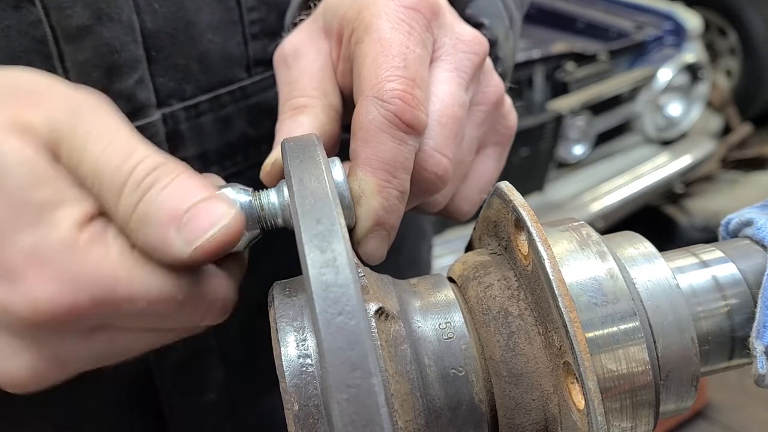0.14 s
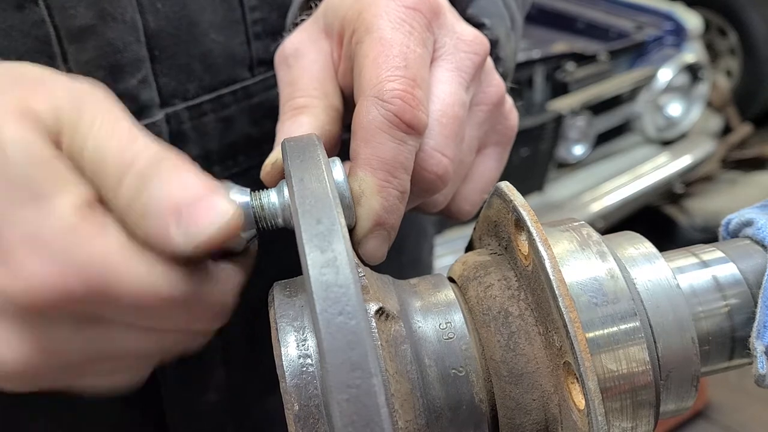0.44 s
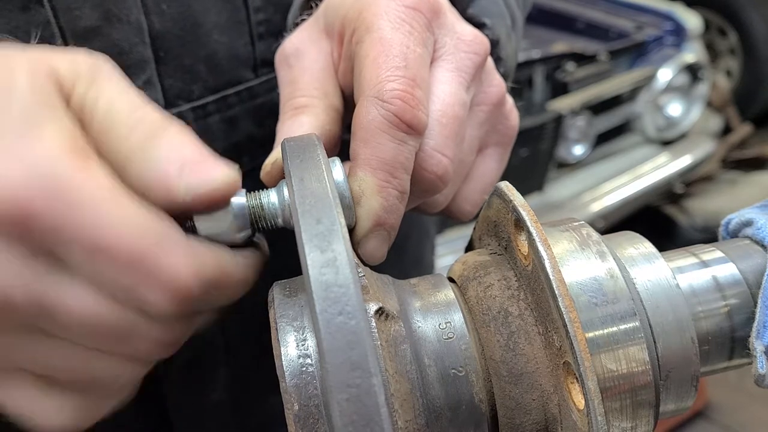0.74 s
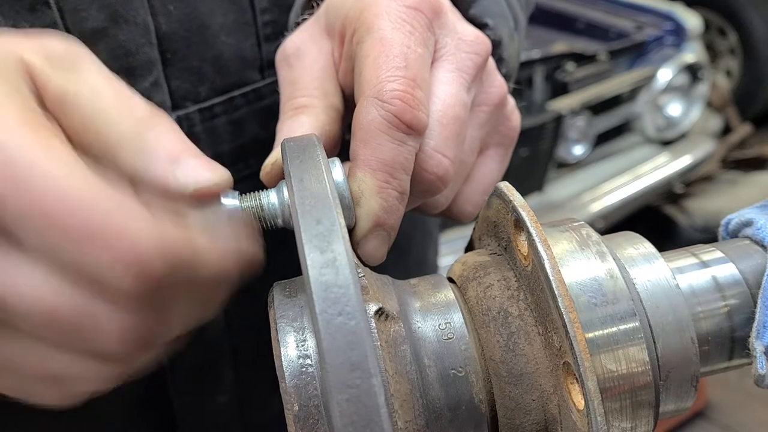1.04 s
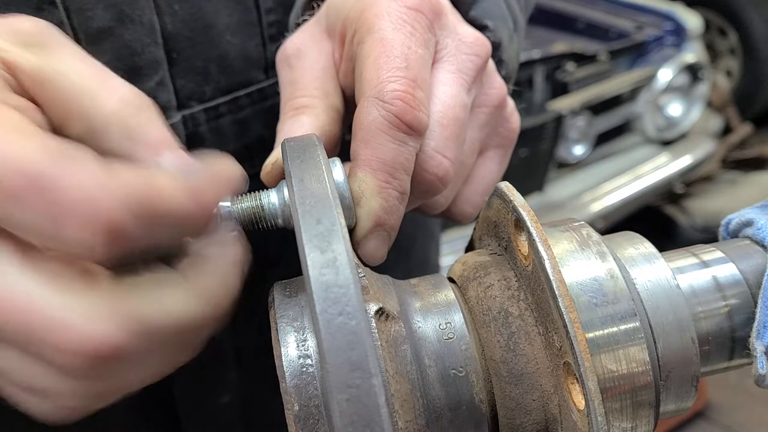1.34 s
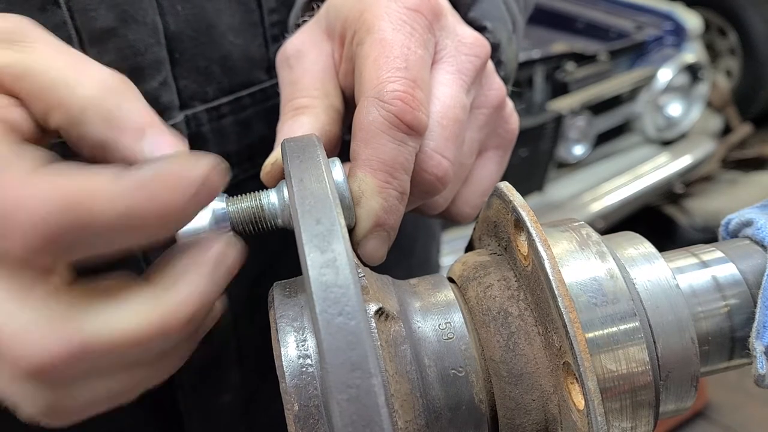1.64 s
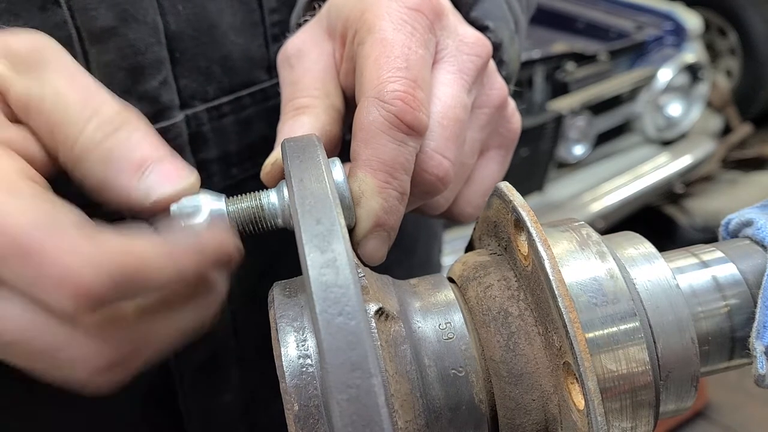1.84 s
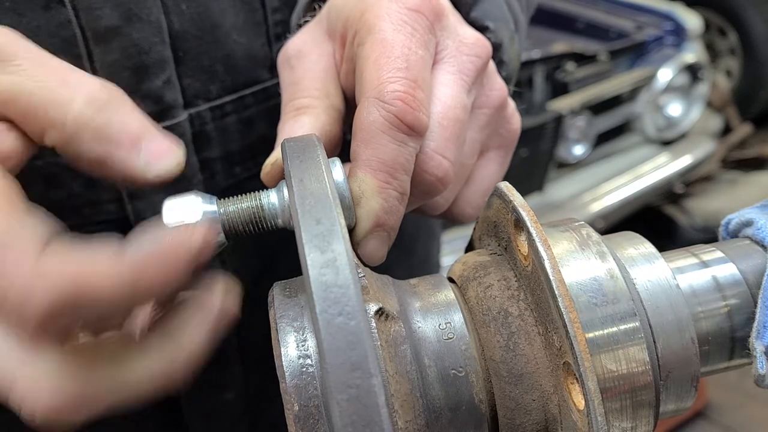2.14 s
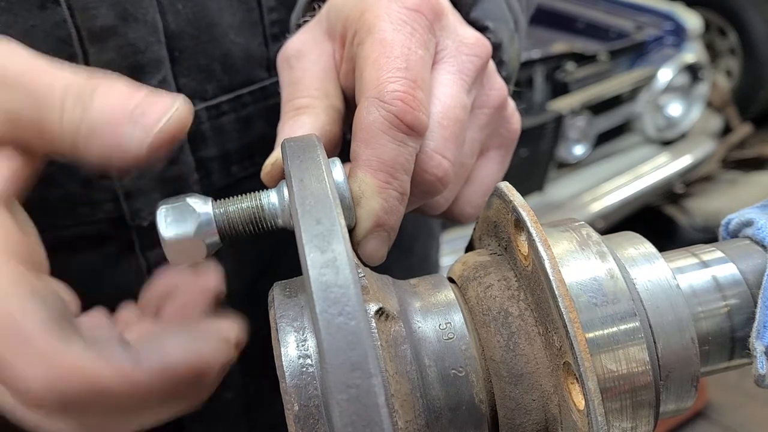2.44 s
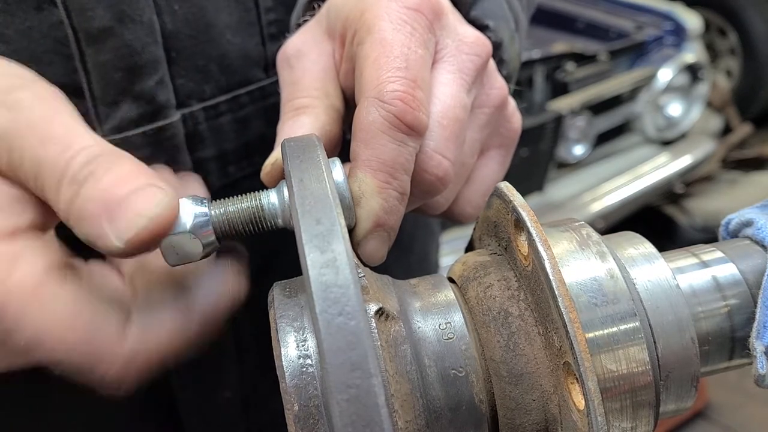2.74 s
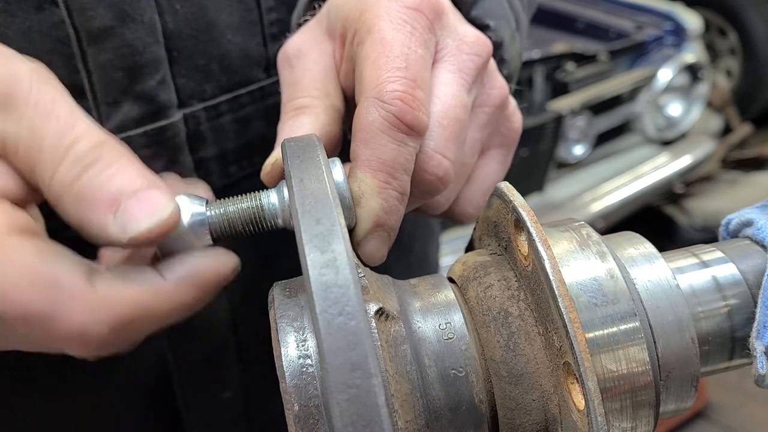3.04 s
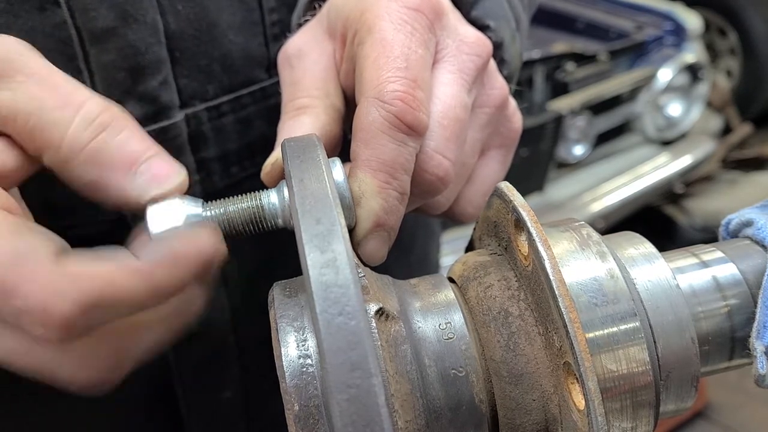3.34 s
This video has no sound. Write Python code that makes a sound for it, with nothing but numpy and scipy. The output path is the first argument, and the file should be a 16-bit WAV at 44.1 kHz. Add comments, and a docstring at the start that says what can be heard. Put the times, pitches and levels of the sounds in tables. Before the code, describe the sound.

A steel nut is flicked along a threaded stud, clicking, rasping and clinking.

```python
"""Flicking a lug nut

A steel lug nut is flicked along a wheel stud by hand, about four times a second, close by in a garage.
At each flick a finger lands with a dull tick and a thud of the hub, the threads rasp as the nut spins,
and the loose nut clinks against the stud and rings. Behind it are a faint low tone and steady air."""
import sys
import numpy as np
from scipy import signal
from scipy.fft import rfft, irfft
from scipy.io import wavfile
from scipy.ndimage import uniform_filter1d

SR = 44100
rng = np.random.default_rng(int(sys.argv[2]) if len(sys.argv) > 2 else 0)


def bounce(signal):
    """Save signal as a 16-bit WAV file at the path given by the first command-line argument."""
    frames = np.transpose(np.atleast_2d(signal))
    limited = np.clip(frames, -1, 1)
    pcm = np.round(limited * 32767).astype(np.int16)
    wavfile.write(sys.argv[1], SR, pcm)


N = 154350
CONTACT_RISE_S = 0.0004
STEEL_ALIKE = 0.65  # how alike the left and right noise are, from 0 to 1


# The loose nut hits the stud: t/s, click/dB, extra top treble/dB, nut ring/dB, stud ring/dB
CLINKS = [(.2196, -34, -28, -70, -60), (.5631, -38.5, -41, -59, -64), (0.8161, -46, -24, -48, -35),
          (1.041, -46.5, -17, -67, -59), (1.107, -33.5, -36, -56, -35), (1.307, -40, -19, -66, -57),
          (1.5962, -25.5, 10, -31.5, -36), (1.654, -35.5, -8, -64, -57), (1.86, -39.5, 5, -56, -41),
          (1.8753, -37, -12, -43, -39), (1.8898, -27, -7, -31, -33), (1.9169, -32.5, -8, -41, -40.5),
          (2.093, -31.5, 10, -54, -60), (2.1381, -27.5, 5, -33, -31), (2.203, -47.5, 11, -77, -50.5),
          (2.359, -29, -19, -53, -53), (2.38, -34, 14, -42.5, -35), (2.394, -30.5, -2, -29, -35),
          (2.6, -37.5, -23, -49, -53), (2.621, -33.5, -15, -51, -41)]
def clinks():
    """The free nut knocks against the stud, and both ring."""
    out = np.zeros((2, N))
    for s, db, snap_db, nut_db, stud_db in CLINKS:
        add(out, s, knock(db, 0, snap_db, nut_db, stud_db, damping=0.97, nut_snap_db=max(snap_db, 0) / 2))
    return out


# A finger lands: t/s, tick/dB, treble tilt/dB per octave, extra top treble/dB, stud ring/dB, thud/dB
TOUCHES = [(0.146, -50, -7, -25, -62, -74), (0.4336, -31.5, 13.5, -7.5, -74, -54.5),
           (0.721, -25.5, -3.5, 13.5, -43, -42), (0.996, -46, -5.5, -44, -95, -48.5),
           (1.253, -48.5, -8, -34, -65, -46), (1.539, -34, -1, -34, -56, -39),
           (1.789, -30, 3, -21, -42, -43.5), (2.046, -31, -1.5, -23, -74, -41.5),
           (2.283, -30, 0, 0, -37, -48.5), (2.523, -30, 1, -14.5, -86, -47),
           (2.769, -29.5, 0, 2, -28, -48.5), (3.0155, -36, -0.5, -6, -41, -65),
           (3.271, -59.5, -5, -14, -80, -52.5), (3.3445, -27.5, -2.5, 1, -24, -55)]
def finger_ticks():
    """A finger brushes the nut just before it lands, then the nut seats with a tick that the finger damps."""
    out = np.zeros((2, N))
    for s, db, tilt_db, snap_db, stud_db, _ in TOUCHES:
        scrape = amp(db - 23) * slide_in()
        add(out, s - scrape.shape[1] / SR, scrape)
        tick = knock(db, tilt_db, snap_db, db - 12, stud_db, damping=0.8, nut_snap_db=9 + snap_db / 2)
        add(out, s, tick)
    return out


# Tone of the hub's thud: f/Hz, level/dB
THUD_TONE = [(25, -29), (70, 1.5), (135, -2), (185, -2.5), (250, -20), (400, -34), (900, -69)]
def hub_thuds(size=20000, rise_s=0.0034, fade_s=0.039, tail_s=0.13):
    """Each landing finger shakes the heavy hub."""
    out, t = np.zeros((2, N)), np.arange(size) / SR
    shape = np.minimum(t / rise_s, 1) * (np.exp(-t / fade_s) + amp(-11) * np.exp(-t / tail_s))
    for s, *_, db in TOUCHES:
        rumble = unit(through(rng.standard_normal(size), colour(THUD_TONE)))
        add(out, s, amp(db) * shape * rumble)
    return out


# Tone of a brief contact on steel: f/Hz, level/dB
STEEL_TONE = [(200, -31), (450, -10.5), (650, 6), (930, -23), (1180, -0.5), (1600, -5.5), (2120, -7),
              (3470, 2.5), (3720, 5.5), (3980, -2), (4250, 8.5), (4750, 0.5), (5450, -1), (6100, 7.5),
              (6600, -11), (7150, 2.5), (7800, -16), (8700, -27), (9700, -23), (11200, -34), (13200, -45),
              (16000, -55)]
# The notes each part rings with: f/Hz, level/dB, time to fade by 60 dB/s, left over right/dB
NUT_MODES = [(4106, -1.5, .1, -9), (7014, -5, .1, 4), (9435, -22, .12, -4), (9728, -21, .1, 0),
             (9790, -25, .08, 1), (13240, -23, .1, 0), (13490, -32, .09, 1), (14550, -27, .1, 7),
             (14980, -37, .09, 3)]
STUD_MODES = [(5560, -12, .06, -7), (5885, 0, .11, 5), (5965, -5, .07, 2), (6135, -3, .07, -1)]
HUB_MODES = [(549, -2, .13, -6), (656, -.5, .08, -5), (1170, -4, .1, -5), (1208, -4, .14, -9),
             (1428, -8, .17, 6), (2099, -10, .06, -10), (2659, -1, .09, 2), (3391, -6, .08, 9),
             (3662, 2, .09, -10), (3730, 1, .05, -7), (3800, 1, .06, -2), (4170, 0, .05, -7),
             (4326, 0, .09, -5), (4550, -2, .04, -4), (4828, -5, .08, -2), (5146, -6, .05, -9)]
def knock(click_db, tilt_db, snap_db, nut_db, stud_db, damping, nut_snap_db, size=16000):
    """The threads meet in a few milliseconds of tiny contacts, then hub, nut and stud ring."""
    t = np.arange(size) / SR
    contact = np.exp(-np.maximum(t - CONTACT_RISE_S, 0) / 0.004)
    rattle = amp(-14) * np.exp(-t / 0.011)
    shape = np.minimum(t / CONTACT_RISE_S, 1) * (contact + rattle)
    click = through(shape * pair(size, STEEL_ALIKE), colour(STEEL_TONE, tilt_db, snap_db))
    hub = amp(click_db - 5) * ring(HUB_MODES)
    nut = amp(nut_db) * ring(NUT_MODES, damping, nut_snap_db)
    stud = amp(stud_db) * ring(STUD_MODES, damping)
    return amp(click_db) * click + hub + nut + stud


def ring(modes, damping=1, snap_db=0, size=16000, detune=0.0007, scatter_db=3):
    """A struck part rings a little differently each time; damping below 1 shortens the ring."""
    t, out = np.arange(size) / SR, np.zeros((2, size))
    for hz, db, t60, left_db in modes:
        hz = hz * (1 + detune * rng.standard_normal())
        wave = np.sin(2 * np.pi * (hz * t + rng.random()))
        level = amp(db + snap(hz, snap_db) + scatter_db * rng.standard_normal())
        fade = np.exp(-np.log(1000) * t / (t60 * damping))
        out += amp([[left_db / 2], [-left_db / 2]]) * level * wave * fade
    strength = np.sqrt(sum(amp(mode[1]) ** 2 for mode in modes) / 2)
    return out * (1 - np.exp(-t / CONTACT_RISE_S)) / strength


def slide_in(size=1000, swell_s=0.003):
    """A brush of the finger that swells quickly just before the tick."""
    t = np.arange(size) / SR
    return np.exp((t - t[-1]) / swell_s) * through(pair(size, STEEL_ALIKE), colour(STEEL_TONE))


# The nut spins: t/s at top speed, speeding up/s, slowing down/s, rasp/dB, low chatter/dB
SPINS = [(0.239, 0.055, 0.02, -38, -38.5), (0.528, 0.069, 0.018, -35.5, -41.5),
         (0.808, 0.055, 0.046, -35.5, -36.5), (1.084, 0.072, 0.075, -41.5, -40.5),
         (1.344, 0.066, 0.044, -39, -45.5), (1.611, 0.067, 0.07, -38.5, -41),
         (1.876, 0.082, 0.014, -44, -44), (2.12, 0.084, 0.045, -46.5, -45.5),
         (2.368, 0.091, 0.098, -41.5, -47.5), (2.597, 0.045, 0.043, -42.5, -46.5),
         (2.862, 0.064, 0.052, -44, -51.5), (3.098, 0.056, 0.059, -45, -48.5),
         (3.349, 0.089, 0.048, -51, -49)]
# Tone of the nut chattering in the thread: f/Hz, level/dB
CHATTER_TONE = [(100, -9.5), (190, -4), (290, -50), (480, -10.5), (550, 1), (680, 1.5), (780, -13),
                (930, -34), (1190, 3), (1330, -14.5), (2200, -19), (4000, -87.5)]
def thread_rasp(size=22050):
    """The rasp swells as the nut speeds up and dies as it coasts; each grip favours other notes."""
    out, t = np.zeros((2, N)), (np.arange(size) - size / 2) / SR
    slips, wobble = tiny_slips(), tiny_slips()[0]
    for s, up, down, rasp_db, chatter_db in SPINS:
        from_peak = np.minimum(np.maximum(-t / up, t / down), 10)
        speed = amp(-20 * from_peak ** 1.41)
        now = np.clip(round(s * SR) - size // 2 + np.arange(size), 0, N - 1)
        modes = sum(amp(db) * unit(ring(part, damping=0.8, snap_db=3))
                    for part, db in [(NUT_MODES, -8), (STUD_MODES, -7), (HUB_MODES, -3)])
        friction = amp(rasp_db) * speed * slips[:, now]
        scrape = amp(-5) * through(friction, colour(STEEL_TONE, snap_db=-10))
        chatter = through(amp(chatter_db) * speed * wobble[now], colour(CHATTER_TONE))
        ringing = through(friction[0], modes / np.sqrt(modes.shape[1]))
        out[:, now] += scrape + chatter + ringing
    return out


def tiny_slips(per_s=1600, spread_db=3.3, flutter_db=3):
    """Rubbing surfaces move in tiny slips of uneven size that come in clumps."""
    happens = rng.random(N) < per_s / SR
    sizes = amp(spread_db * np.minimum(rng.exponential(1, N), 4))
    clumps = unit(uniform_filter1d(uniform_filter1d(rng.standard_normal(N), size=200), size=200))
    return unit(happens * sizes * amp(flutter_db * clumps) * pair(N, STEEL_ALIKE))


# Skin brushes the nut: t/s, half-length/s, level/dB
BRUSHES = [(0.19, 0.028, -61), (0.454, 0.028, -54.5), (1.291, 0.022, -56.5)]
# Tone of skin on steel: f/Hz, level/dB
SKIN_TONE = [(3000, 10), (6500, 5), (8000, -19), (10000, -13), (14000, 1), (16000, -7)]
def finger_brushes():
    """A fingertip drags on the steel with a faint hiss."""
    t = np.arange(N) / SR
    level = sum(amp(db) * np.exp(-((t - s) / width) ** 2) for s, width, db in BRUSHES)
    return through(level * tiny_slips(), colour(SKIN_TONE))


# How long the garage echoes: f/Hz, time to fade by 60 dB/s
ECHO_TIMES = [(100, 0.96), (700, 0.24), (2500, 0.2), (6000, 0.12), (14000, 0.12)]
def garage_echo(x, size=20000, level_db=-13.5, rise_s=0.0012):
    """The room returns a short wash of echoes, the treble dying first."""
    hz, t, noise = signal.stft(rng.standard_normal((2, size)), SR, nperseg=256)
    fade = np.exp(-np.log(1000) * t / read(ECHO_TIMES, hz)[:, None])
    tail = signal.istft(noise * fade, SR)[1]
    tail *= np.minimum(np.arange(tail.shape[1]) / SR / rise_s, 1)
    return amp(level_db) * through(x, tail / np.linalg.norm(tail[0]))


# Path of the low tone: t/s, f/Hz, level/dB
TONE_PATH = [(1.49, 328, -88), (1.57, 339, -56), (1.64, 317.6, -86), (1.739, 322, -78), (1.781, 348, -62),
             (1.808, 425, -54.5), (1.86, 434, -66), (1.949, 463, -84)]
def low_tone():
    """A faint tone swells twice and slides upward behind the middle flicks."""
    s, hz, db = np.transpose(TONE_PATH)
    t = np.arange(N) / SR
    phase = 2 * np.pi * np.cumsum(np.interp(t, s, hz)) / SR
    return np.sqrt(2) * np.interp(t, s, amp(db), 0, 0) * np.sin(phase)


# Tone of the garage air: f/Hz, level/dB
AIR_TONE = [(12, -14), (20, 4.5), (81, 2.5), (310, -20), (377, -18), (485, -23), (949, -21.5), (1440, -23),
            (2020, -22.5), (2910, -21.5), (3740, -30.5), (6720, -34), (7310, -56), (11800, -39.5),
            (16000, -42)]
def garage_air(level_db=-57.5):
    """Steady rumble and hiss fill the garage."""
    gain = amp(read(AIR_TONE, np.fft.rfftfreq(N, 1 / SR)))
    return amp(level_db) * unit(irfft(rfft(pair(N, alike=0.54)) * gain, N))


# Which side each pitch of the steel is heard on: f/Hz, left over right/dB
BALANCE = [(600, -5), (1200, -4), (2100, -9), (2750, 2), (3300, 8), (3680, -8), (4600, -3), (5400, -7),
           (5950, 3), (6300, -2), (7400, 6), (15000, 2)]
def colour(points, tilt_db=0, snap_db=0, size=4096):
    """Turns a tone table into a stereo filter of unit energy, balanced like the steel."""
    hz = abs(np.fft.fftfreq(size, 1 / SR))
    tilt = tilt_db * np.log2(np.maximum(hz, 500) / 500)
    sides = np.outer([.5, -.5], read(BALANCE, hz))
    db = read(points, hz) + tilt + snap(hz, snap_db) + sides
    spectrum = np.exp(np.conj(signal.hilbert(np.log(amp(db)))))  # nothing sounds before the hit
    return unit(np.fft.ifft(spectrum).real) / np.sqrt(size)


def snap(hz, db, above_hz=8030):
    """A harder contact lifts the top treble by db."""
    return db / (1 + (above_hz / (hz + 1)) ** 12)


def amp(db):
    """Turns decibels into a gain."""
    return 10 ** (np.asarray(db) / 20)


def unit(x):
    """Scales to an average strength (rms) of 1."""
    return x / np.sqrt(np.mean(x ** 2) + 1e-20)


def read(points, hz):
    """Looks up a table by frequency, on a log scale."""
    f, value = np.transpose(points)
    return np.interp(np.log(hz + 1), np.log(f), value)


def add(mix, s, sound):
    """Mixes a stereo sound in at s seconds."""
    part = mix[:, round(s * SR):][:, :sound.shape[1]]
    part += sound[:, :part.shape[1]]


def through(x, response):
    """Passes a sound through a filter, keeping its length."""
    return signal.fftconvolve(np.atleast_2d(x), response, axes=1)[:, :x.shape[-1]]


def pair(size, alike):
    """Left and right noise, partly alike."""
    a, b = rng.standard_normal((2, size))
    return np.array([a, alike * a + np.sqrt(1 - alike ** 2) * b])


# How far the steel's sound on the right trails the left: f/Hz, lag/radians
RIGHT_LAG = [(300, 0), (520, -1.3), (1200, -2.1), (1750, -3.7), (2100, -2.3), (2660, 1.4), (3660, 4.9),
             (4100, 7.3), (4330, 3.2), (4820, 5.8), (5340, 4.3), (6300, 4), (7000, 6.3), (9600, 5.3),
             (13240, 4.7), (14550, 7.3)]
def scene():
    """The steel reaches left and right out of step and echoes; thuds, tone and air lie underneath."""
    left, right = finger_ticks() + clinks() + thread_rasp() + finger_brushes()
    lag = np.exp(-1j * read(RIGHT_LAG, np.fft.rfftfreq(N, 1 / SR)))
    steel = np.array([left, irfft(rfft(right) * lag, N)])
    return steel + garage_echo(steel) + hub_thuds() + low_tone() + garage_air()


def record(dry):
    """Cuts the treble above 16100 Hz."""
    lowpass = signal.firwin(401, 16100, window=("kaiser", 9), fs=SR)
    return signal.oaconvolve(dry, lowpass[None], "same")


dry = scene()
out = record(dry)
bounce(out)
```